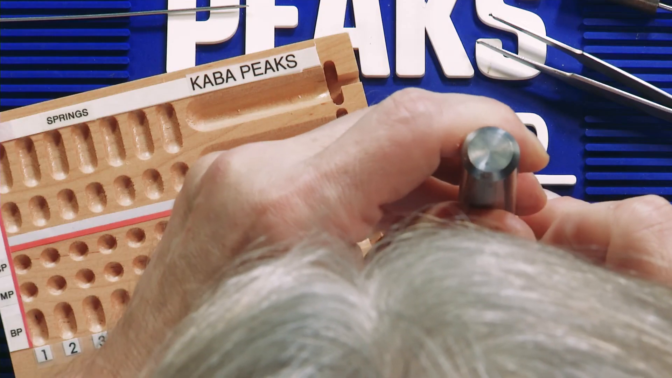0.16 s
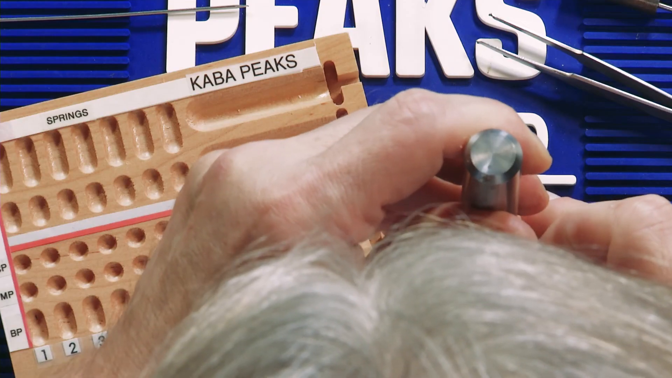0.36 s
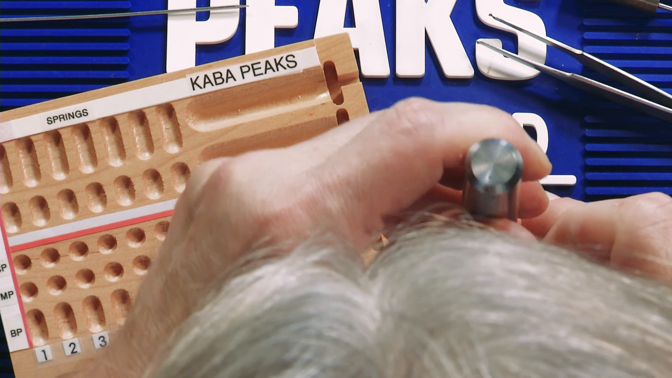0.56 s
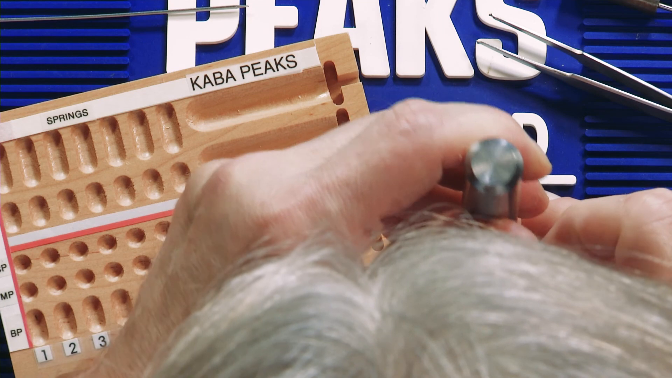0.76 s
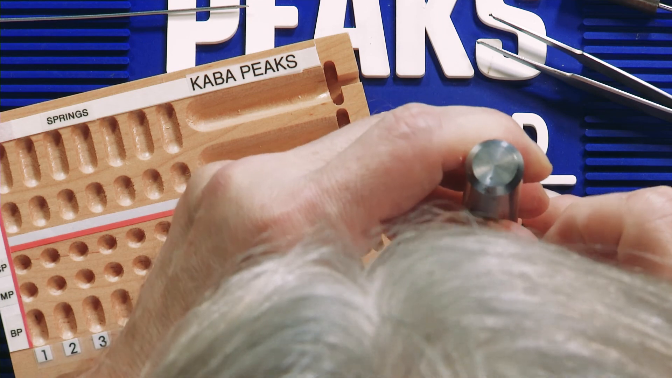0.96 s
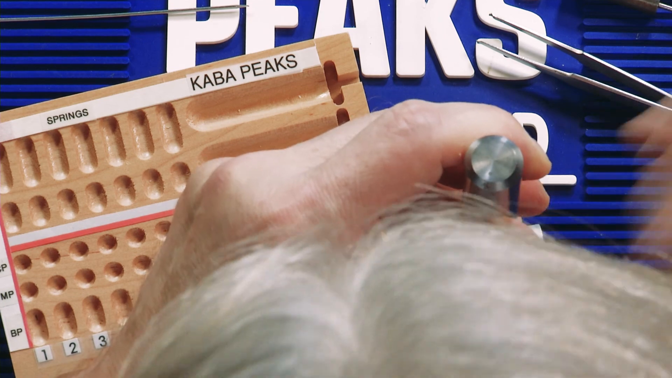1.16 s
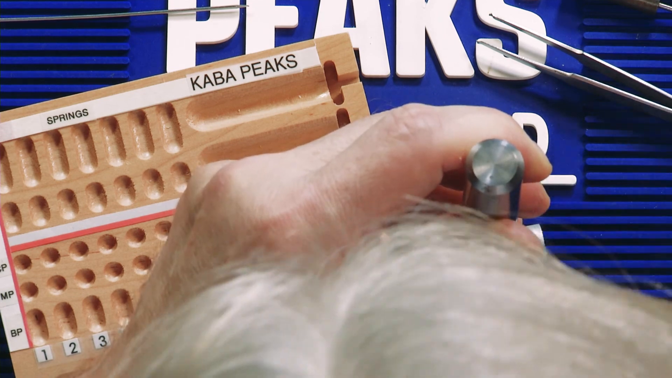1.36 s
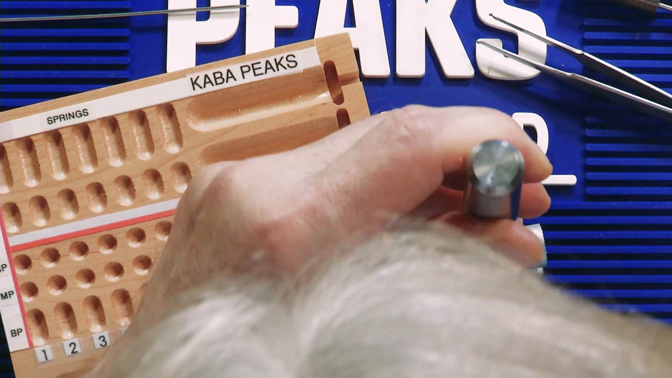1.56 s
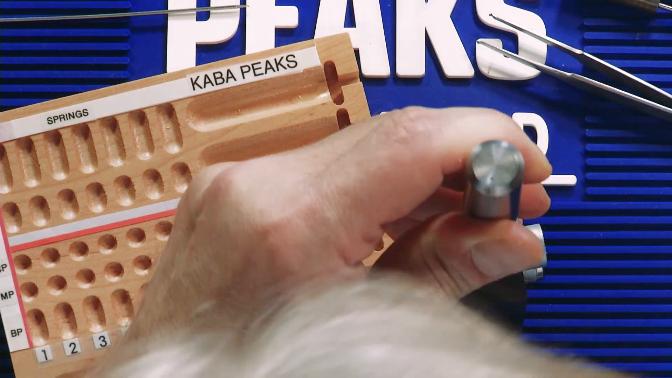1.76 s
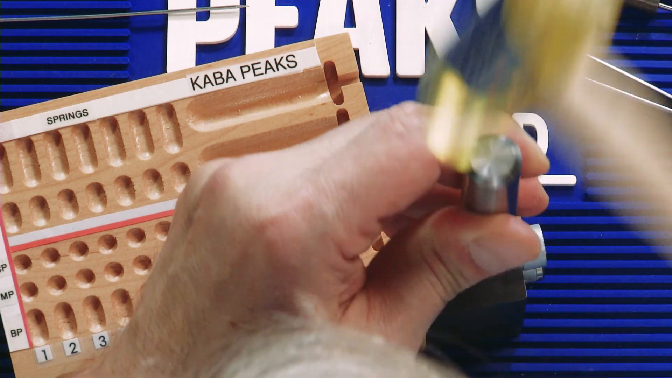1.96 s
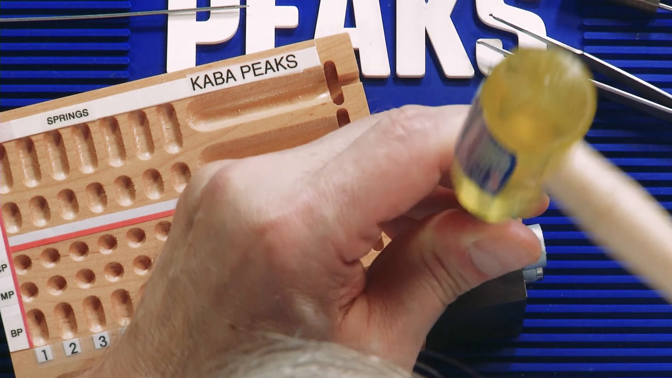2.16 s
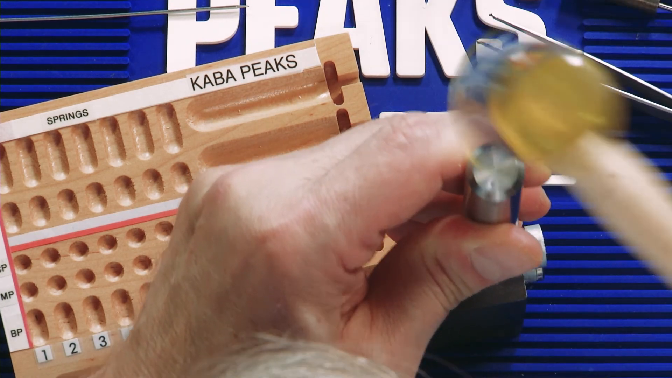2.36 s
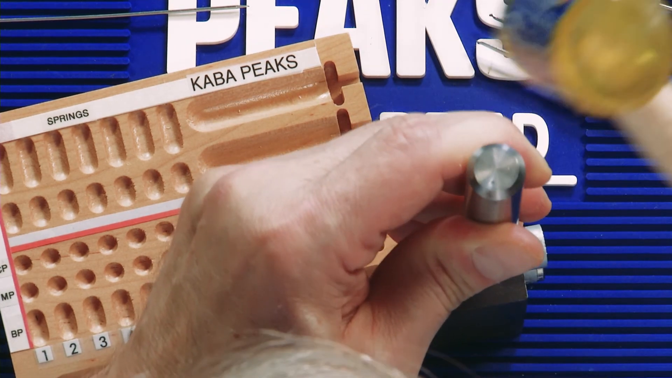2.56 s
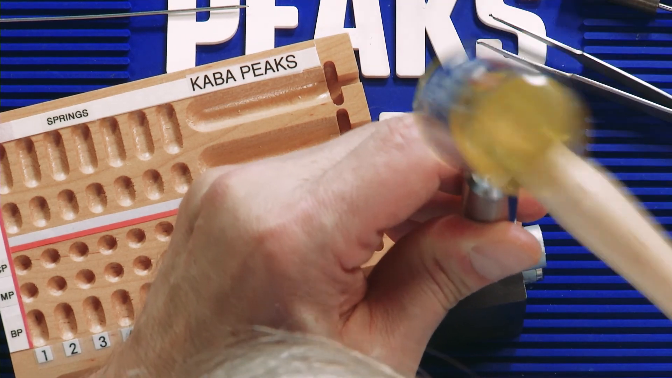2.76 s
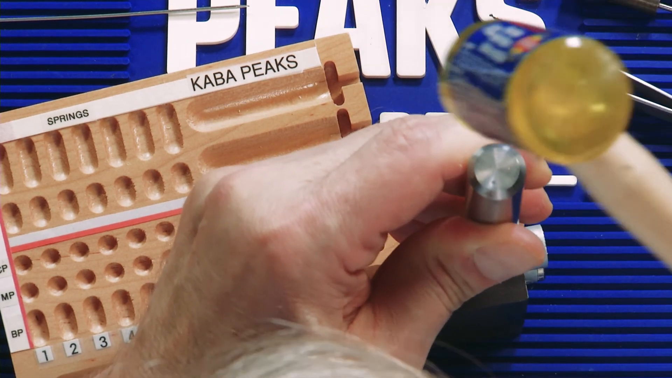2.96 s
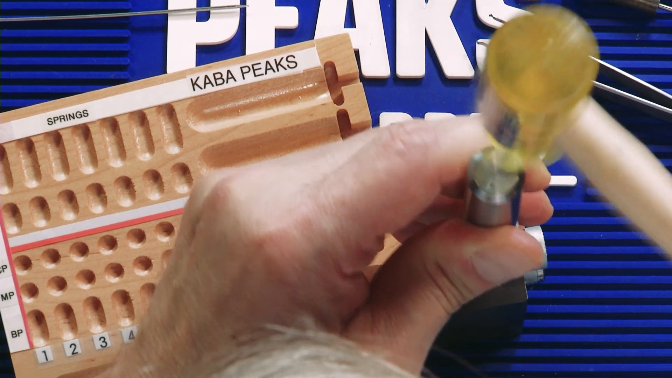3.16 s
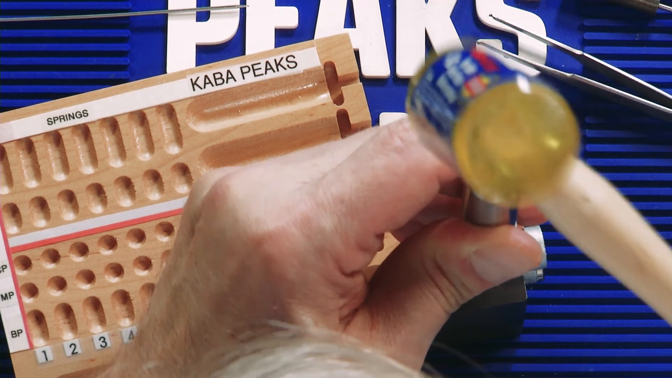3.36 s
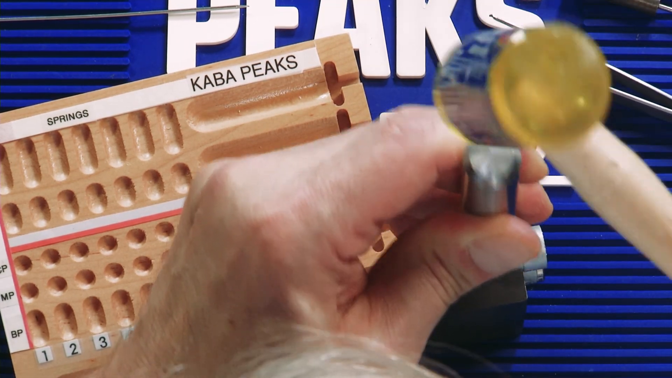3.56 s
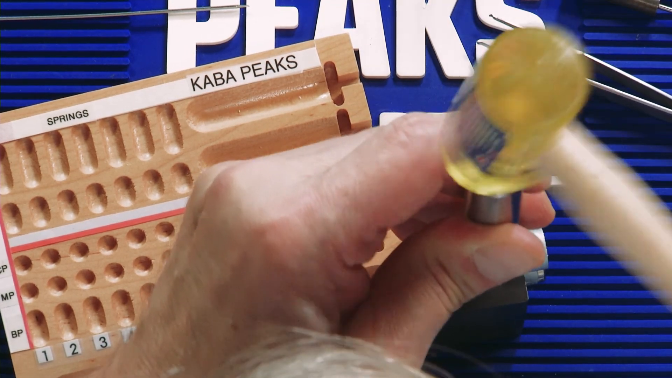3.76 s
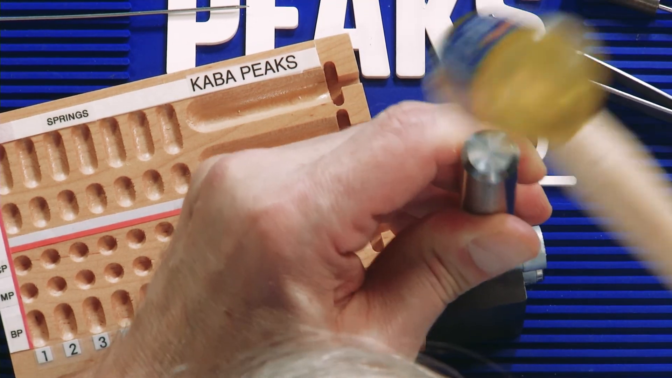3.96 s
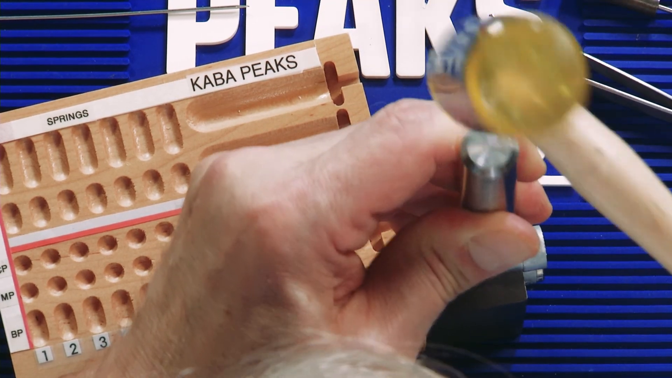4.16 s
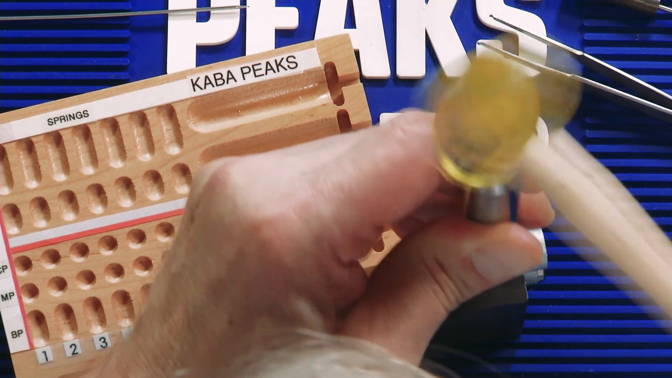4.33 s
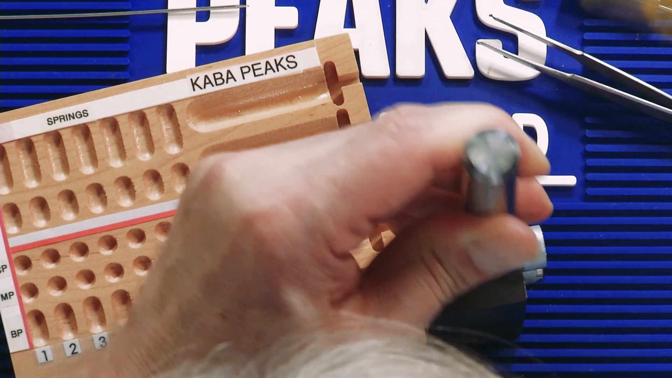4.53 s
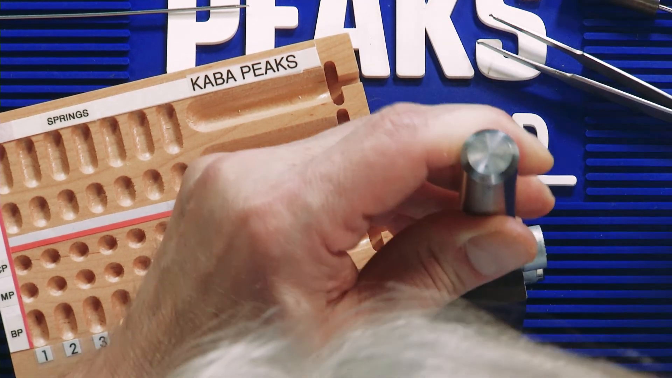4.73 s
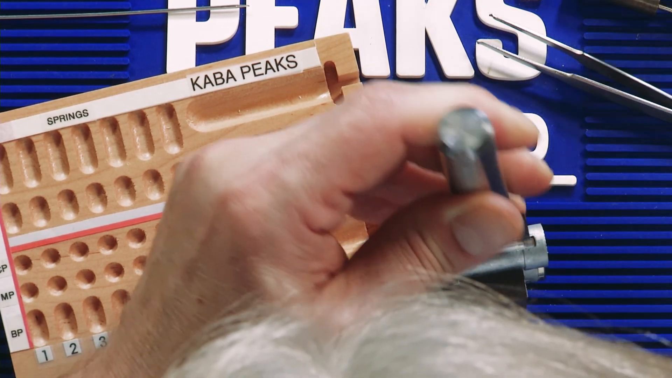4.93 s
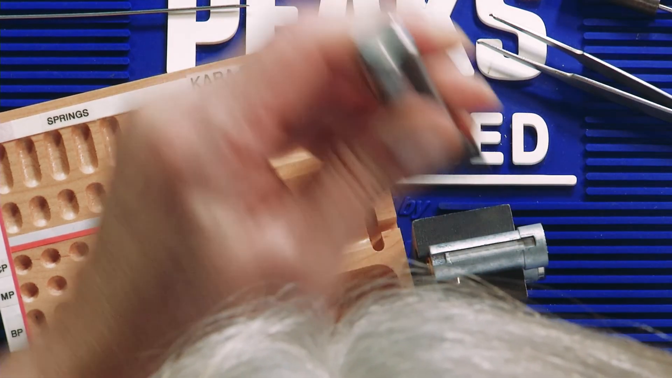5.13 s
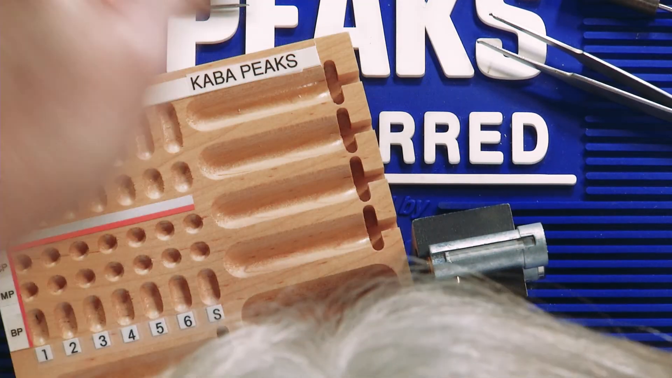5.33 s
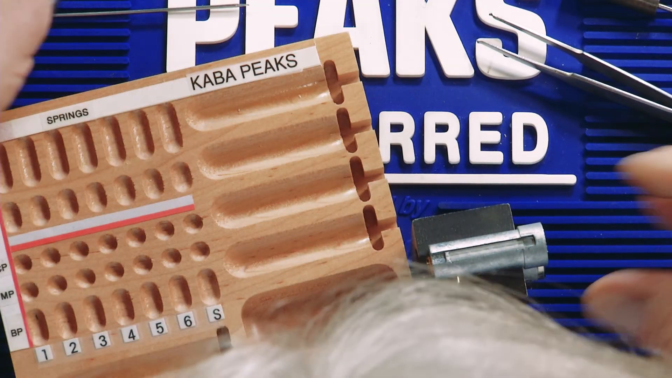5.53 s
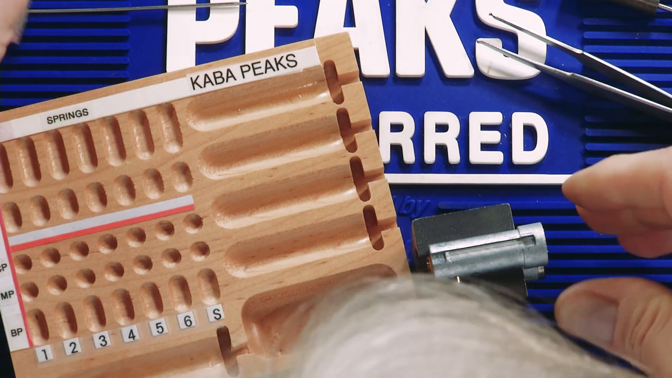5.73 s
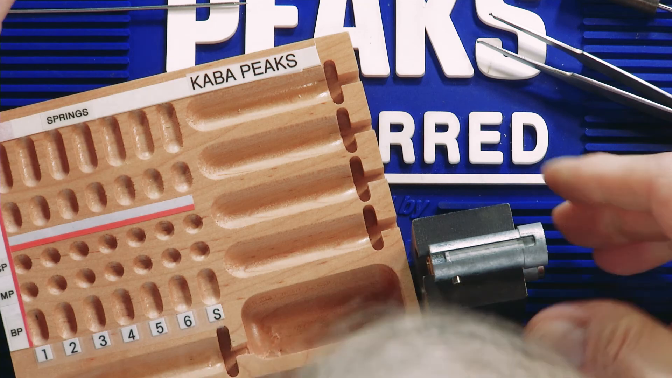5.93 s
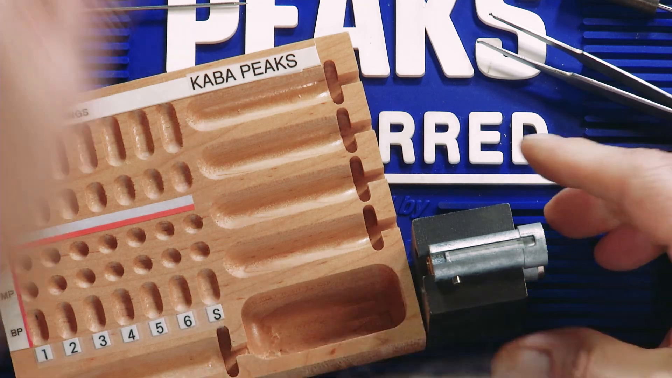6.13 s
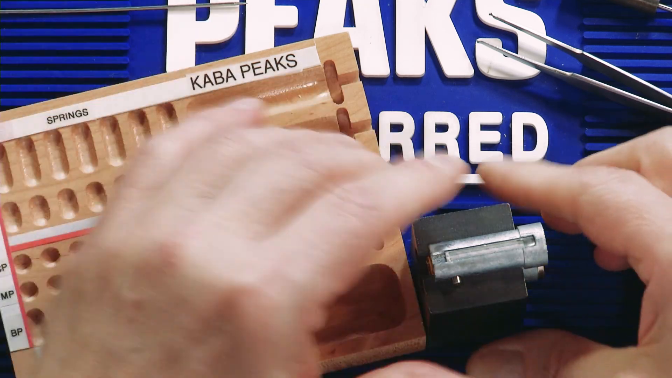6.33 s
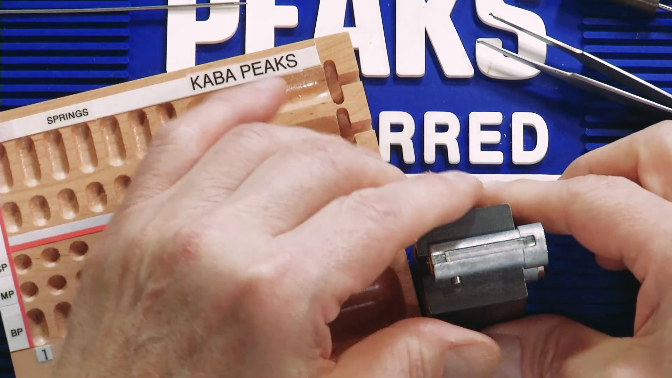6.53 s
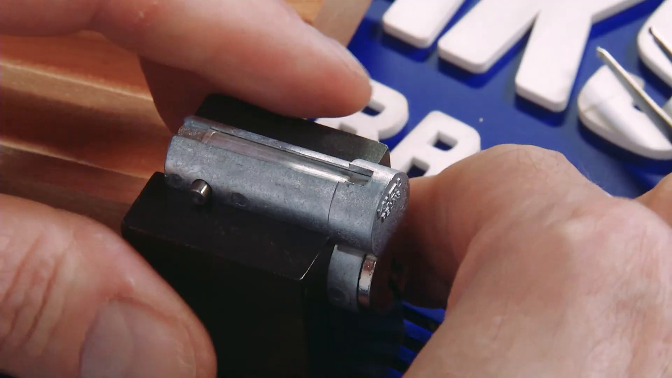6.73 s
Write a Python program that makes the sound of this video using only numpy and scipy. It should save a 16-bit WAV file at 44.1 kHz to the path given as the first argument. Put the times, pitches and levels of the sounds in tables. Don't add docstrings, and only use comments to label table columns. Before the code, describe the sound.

Close-up hard metallic cracks with woody thuds, evenly spaced, followed by a mallet set down, a steel punch dropped and soft handling.

```python
import sys
import numpy as np
from scipy import signal
from scipy.fft import rfft, irfft
from scipy.io import wavfile

SR = 44100
rng = np.random.default_rng(int(sys.argv[2]) if len(sys.argv) > 2 else 0)


def master(y):
    cut = np.clip(np.atleast_2d(y).T, -1, 1)
    pcm = np.round(cut * 32767)
    wavfile.write(sys.argv[1], SR, pcm.astype(np.int16))


def gain_from_db(level_db):
    decades = np.asarray(level_db, float) / 20
    return 10 ** decades


N = 303893

# (frequency [Hz], level [dB], t60 [s])
FRAME_SWAY = [(32.8, -34, 0.34), (39.3, -28, 0.12), (58.3, -24, .1), (129.7, -41.5, .6), (171.4, -35, 0.49),
              (235.4, -36, 0.29), (304.7, -30, 0.35), (352.3, -34.5, 0.31)]


def rms_one(x):
    return x / np.sqrt(np.mean(x ** 2) + 1e-20)


def at_hz(rows, hz):
    at, *columns = np.transpose(rows)
    return [np.interp(np.log(hz), np.log(at), c) for c in columns]


def band(x, low_hz, high_hz):
    edges = [max(low_hz, 10), min(high_hz, .45 * SR)]
    return signal.sosfilt(signal.butter(2, edges, "band", fs=SR, output="sos"), x)


def ring(modes, force, damp=1):
    out = 0
    for hz, db, t60 in modes:
        decay_s = min(t60, .03) * damp if damp < 1 else t60
        r = gain_from_db(-60 / decay_s / SR)
        w = 2 * np.pi * hz / SR
        out = out + signal.lfilter([0, gain_from_db(db) * np.sin(w)], [1, -2 * r * np.cos(w), r * r], force + 1e-18)
    return out


def both_ways(toward, away, force):
    near = ring(toward, force) - ring(away, force)
    far = ring(toward, force, damp=.3) - ring(away, force, damp=.3)
    return np.array([near, far])


def add(track, s, sound):
    i = round(s * SR)
    track[..., i:i + sound.shape[-1]] += sound[..., :N - i]


def push(seconds):
    shape = np.sin(np.pi * np.clip(np.arange(200) / SR / seconds, 0, 1))
    return shape / shape.sum()


def impulse(length):
    return np.r_[1., np.zeros(length - 1)]


def puff(rise_s, fall_s):
    t = np.arange(1500) / SR
    return rng.standard_normal(len(t)) * (1 - np.exp(-t / rise_s)) * np.exp(-t / fall_s)


def background():
    # (frequency [Hz], density [dB per Hz])
    floor = [(12, -36.5), (20, -2.5), (111, 0.5), (273, -9), (452, -6.5), (709, -17), (913, -12),
             (1080, -17.5), (1180, -17), (1320, -15), (1470, -16.5), (2890, -23), (15200, -29.5),
             (16500, -43.5)]
    # (frequency [Hz], level [dB rms])
    hum = [(118.4, -73), (543.7, -83), (775.2, -79.5), (925.9, -79.5), (1007, -83), (1157, -78.5),
           (1238, -82), (1470, -85), (2218, -92), (2239, -87)]
    bin_hz = np.maximum(np.fft.rfftfreq(N, 1 / SR), 10)
    noise = rms_one(irfft(rfft(rng.standard_normal(N)) * gain_from_db(at_hz(floor, bin_hz)[0]), N))
    t = np.arange(N) / SR
    wander = np.cumsum(rng.standard_normal((len(hum), N)), axis=1) * 0.015
    tones = sum(gain_from_db(db + 2.5) * np.sin(2 * np.pi * hz * t + w) for (hz, db), w in zip(hum, wander))
    return gain_from_db(-64) * noise + tones


def moving(column, rest_db):
    # (start [s], hold [s], rub [dB], bench sway [dB])
    moves = [(.4, .12, -67.5, -59), (1.03, 0.044, -91, -62), (1.53, 0.29, -60, -54),
             (2.264, 0.041, -68.5, -64), (2.847, 0.66, -77, -67.5), (5.005, 0.021, -61.5, -61),
             (5.447, 0.31, -57.5, -48), (5.9, 0.15, -59.5, -59.5), (6.151, 0.045, -71.5, -47),
             (6.398, 0.32, -66.5, -61)]
    attack_s, release_s = 0.24, .12
    columns = np.transpose(moves)[:, :, None]
    s, hold, db = columns[0], columns[1], columns[column]
    t = np.arange(N) / SR
    below_db = 20 * np.maximum(np.maximum((s - t) / attack_s, (t - s - hold) / release_s), 0)
    return np.sqrt(gain_from_db(rest_db) ** 2 + np.sum(gain_from_db(db - below_db) ** 2, axis=0))


def hands():
    # (time [s], peak [dB], centre [Hz], width [octaves])
    ticks = [(1.119, -69, 778, 0.68), (2.278, -39, 1380, 0.87), (4.968, -52, 750, 1),
             (5.064, -49.5, 865, 0.31), (5.677, -46, 730, 0.98), (5.717, -42.5, 773, 0.56),
             (5.868, -46.5, 705, 0.54), (6.166, -54, 1710, .3), (6.377, -55, 2480, 0.23),
             (6.603, -47, 2050, 0.34), (6.628, -54, 2190, .2)]
    # (time [s], peak [dB], centre [Hz], width [octaves])
    clicks = [(1.9894, -58, 4070, 0.7), (2.2796, -59, 3180, 0.31), (4.689, -55, 4200, 0.42),
              (4.7987, -61, 7200, 0.7), (4.9707, -52, 9696, 0.95), (5.062, -53.5, 3870, 1),
              (5.7692, -53, 3180, 0.82), (6.409, -60, 6440, 0.36), (6.543, -58.5, 6870, 0.4),
              (6.559, -63, 2570, 0.7), (6.603, -49, 6200, 0.26), (6.8755, -59, 7360, 0.49)]
    # (time [s], peak [dB], pitch [Hz])
    thumps = [(5.884, -34, 275), (6.012, -30, 313), (6.506, -43, 143), (6.602, -31.5, 142),
              (6.656, -24, 144.5)]
    out = np.zeros(N)
    for s, db, hz, octaves in ticks + clicks:
        spread = 2 ** abs(octaves)
        tick = band(puff(0.00058, 0.0031), hz / spread, hz * spread)
        add(out, s, gain_from_db(db) * tick / np.abs(tick).max())
    for s, db, hz in thumps:
        add(out, s, ring([(hz, db - 7.5, .05)], np.pad(push(0.0014), (0, 4000))))
    lumps = gain_from_db(2.5 * rms_one(band(rng.standard_normal(N), 8, 30)) - 1)
    rub = rms_one(lumps * band(band(rng.standard_normal(N), 95, 510), 67, 1300))
    sway = rms_one(band(rng.standard_normal(N), 35, 47))
    return out + moving(column=2, rest_db=-74) * rub + gain_from_db(-7.5) * moving(column=3, rest_db=-72) * sway


def mallet():
    # (time [s], crack [dB], thud [dB], crack pitch [Hz], ping [dB])
    blows = [
        (2.5366, -7.5, -10, 6407, -15),
        (2.938, -10, -8.5, 6720, -32.5),
        (3.2503, -12.5, -8, 7770, -26.5),
        (3.5595, -9.5, -6, 7570, -26),
        (3.8759, -7.5, -5, 6240, -34),
        (4.1763, -11, -4.5, 6380, -19.5),
        (4.4756, -11, -4, 6337, -20.5),
    ]
    # (time [s], crack [dB], thud [dB])
    rebounds = [(2.5459, -22, -25.5), (2.5638, -30, -31.5), (2.9482, -27, -19), (2.9626, -35.5, -36),
                (3.2629, -17.5, -20), (3.2765, -54.5, -27), (3.573, -18.5, -16), (3.5843, -25, -27.5),
                (3.8948, -48, -17), (4.1921, -21.5, -19), (4.4907, -15, -14.5)]
    # (frequency [Hz], level [dB], t60 [s])
    bench_toward = [(65, -8, .01), (413, 2.4, .014), (743, -17, .06), (847, -11, .028), (1041, -22, .035)]
    # (frequency [Hz], level [dB], t60 [s])
    bench_away = [(142, -22, .1), (258, -.5, .015), (340, -23, .1), (459, -9, .052), (659, -13, .041),
                  (1459, -23, .035)]
    # (frequency [Hz], level [dB], t60 [s])
    block = [(1810, -22.5, 0.015), (2120, -23.5, 0.022), (2720, -31, 0.011)]
    # (frequency [Hz], level [dB], t60 [s])
    steel = [(6860, -26.5, 0.021), (7400, -25.5, 0.011)]
    # (frequency [Hz], level [dB], t60 [s])
    singing = [(350, -42, .55), (630, -41, .75), (937, -47, 1.3)]
    ping_hz = 4990
    force, jolt, chatter, snap, crack = np.zeros((5, N))
    click = impulse(801)
    contacts = blows + [(*r, 6700, -41) for r in rebounds]
    for k, (s, crack_db, thud_db, crack_hz, ping_db) in enumerate(contacts):
        add(force, s, gain_from_db(thud_db + 9) * push(0.00011))
        add(jolt, s, gain_from_db([2 * (thud_db + 6.0)]))
        if k >= len(blows):
            grit = puff(0.00069, 0.0026) * gain_from_db(crack_db - 10)
        else:
            grit = puff(.0006, 0.0011) * gain_from_db(crack_db)
        add(chatter, s, grit)
        add(crack, s, ring([(crack_hz, -14, .004)], grit) + gain_from_db(5) * band(grit, 1500, 10000))
        add(crack, s + 0.00055, ring([(ping_hz, ping_db + 7, .012)], click))
        broad = band(click, 1900, 13000) + ring([(crack_hz, -18, .003)], click)
        add(snap, s, gain_from_db(crack_db + 11.5) * broad)
        far_ping = ring([(ping_hz, ping_db + 10, .005)], click)
        far_knock = gain_from_db(thud_db + 10.5) * band(band(click, 1150, 1900), 1000, 2200)
        add(snap, s, far_ping + far_knock)
    slow = ring(FRAME_SWAY, force) + gain_from_db(-6) * ring(singing, jolt)
    thuds = both_ways(bench_toward + block, bench_away, force)
    return thuds + [slow + crack + ring(steel, chatter), snap]


def knocks():
    # (time [s], peak [dB], main pitch [Hz], contact [ms])
    set_down = [
        (5.1766, -12.5, 960, 0.25),
        (5.1898, -6, 722, 1),
        (5.9784, -42, 710, 0.83),
        (6.011, -49, 880, 0.4),
        (6.02, -30.5, 472, 0.9),
        (6.035, -9.5, 832, 0.58),
    ]
    # (frequency [Hz], level [dB], t60 [s])
    wood = [(315.5, -18.5, 0.089), (422, -13.5, 0.046), (753, -7, 0.032), (946, -2.5, 0.029),
            (1293, -3, 0.026), (1675, -2, 0.016), (2080, -1.5, 0.017), (2520, -8.5, .01)]
    out = np.zeros((2, N))
    soft = signal.butter(3, 2400, fs=SR, output="sos")
    for s, db, hz, contact_ms in set_down:
        force = np.pad(push(np.clip(contact_ms, .1, 3) / 1000), (0, 9000))
        near, far = both_ways(wood[::2] + [(hz, -3, .012)], wood[1::2], force)
        near = signal.sosfilt(soft, band(near, 120, 9000))
        snap = gain_from_db(1) * band(band(impulse(len(force)), 2000, 3300), 1500, 4000)
        far = band(far, 100, 1500) + snap * np.clip(1.1 - contact_ms, 0, 1)
        add(out, s, gain_from_db(db + 3.5) * np.array([near, far]))
        grit = band(puff(0.0006, 0.0093), 2300, 4200) * gain_from_db(-29)
        grit = grit + band(puff(0.00036, .006), 4000, 8000) * gain_from_db(-48)
        add(out, s, gain_from_db(db) * grit * [[1], [2]] * np.clip(.95 - contact_ms, 0, 1))
    return out


def dropped_punch():
    # (time [s], ring [dB], thud [dB], scrape [ms])
    touches = [
        (5.3441, -16.5, -15.5, 0.78),
        (5.3514, -35.5, -23.5, 1.5),
        (5.363, -36, -30, 1.6),
        (5.3754, -41, -32, 2.8),
        (5.382, -30.5, -26.5, 2.3),
        (5.3974, -40.5, -30.5, 3.3),
    ]
    # (frequency [Hz], level [dB], t60 [s])
    damped_bar = [(2148, -13.5, 0.031), (2600, -7.5, 0.01), (3620, -10, 0.0045), (4350, -12, 0.0067),
                  (4666, -20, 0.044), (6900, -19, 0.042)]
    # (frequency [Hz], level [dB], t60 [s])
    free_bar = [(2665, -9, .08), (4860, -13, .22), (5260, -8, .1), (6050, -26, .08), (6810, -26, .05),
                (8180, -12, .08)]
    # (frequency [Hz], level [dB], t60 [s])
    mat = [(284, -9.5, 0.055), (370, -9.5, 0.066), (487.5, -4.5, 0.12), (844, -5.5, 0.044),
           (1037, -16, 0.056), (1386, -8, 0.012)]
    out = np.zeros((2, N))
    for s, ring_db, thud_db, scrape_ms in touches:
        force = np.pad(push(.0003), (0, 20000))
        length = np.clip(scrape_ms, .5, 8) / 1000
        scrape = np.pad(puff(length / 3, length), (0, 18700))
        grit = band(scrape, 300, 7000 / np.sqrt(length * 1000)) * gain_from_db(ring_db + 0.5)
        clatter = ring(damped_bar, grit) + gain_from_db(-12.5) * band(grit, 1400, 5500)
        free_db = ring_db - (22 if s < 5.36 else 6)
        tap = band(band(impulse(len(force)), 2200, 8800), 1500, 9500)
        free = gain_from_db(free_db) * ring(free_bar, tap)
        steel = [clatter + free, gain_from_db(-10) * clatter]
        add(out, s, gain_from_db(thud_db + 7.5) * both_ways(mat[1::2], mat[::2], force) + steel)
        add(out[0], s, gain_from_db(thud_db + 7) * ring(FRAME_SWAY[1:4], force))
    return out


def room(x):
    # (frequency [Hz], level [dB], t60 [s])
    decay = [(40, -33, 0.17), (128, -7.5, 0.98), (220, -5.5, 0.62), (370.6, 6, 0.39), (614, -11.5, 0.36),
             (1100, -6, 0.28), (1810, -4, 0.24), (3080, -12, 0.2), (5000, -14.5, 0.2), (8600, -16, 0.17),
             (15000, -21.5, 0.07)]
    t = np.arange(SR) / SR
    edges = 25 * 2 ** np.arange(0, 9.6, 1 / 3)
    white = rng.standard_normal((2, SR))
    echo = 0
    for k, (low, high) in enumerate(zip(edges, edges[1:])):
        db, t60 = at_hz(decay, np.sqrt(low * high))
        density = np.sqrt(t60 * SR / 14)
        early = gain_from_db(db - 60 * t / t60) / density
        late = gain_from_db(db - 22.5 - 60 * t / (1.2 * t60)) / density
        echo = echo + band(white[k % 2], low, high) * np.hypot(early, late)
    echo = signal.sosfilt(signal.cheby2(10, 50, 15900, fs=SR, output="sos"), echo)
    build = 1 - np.exp(-(t / .0055) ** 2)
    return signal.fftconvolve(x, echo * build)[:N] * gain_from_db(5)


def scene():
    blows, blows_far = mallet()
    set_down, set_down_far = knocks() + dropped_punch()
    echo = room(blows_far + gain_from_db(-2.9) * set_down_far)
    return (blows + set_down + hands() + echo + background())[None]


def roll_off(x):
    return signal.sosfilt(signal.butter(12, 17080, fs=SR, output="sos"), x)


def record(dry):
    overload = .515
    heard = signal.sosfilt(signal.butter(2, 30, "high", fs=SR, output="sos"), dry)
    heard = signal.sosfilt(signal.cheby2(12, 50, 16900, fs=SR, output="sos"), heard)
    limited = heard / (1 + (heard / overload) ** 8) ** (1 / 8)
    return roll_off(limited)


dry = scene()
out = record(dry)
master(out)
```